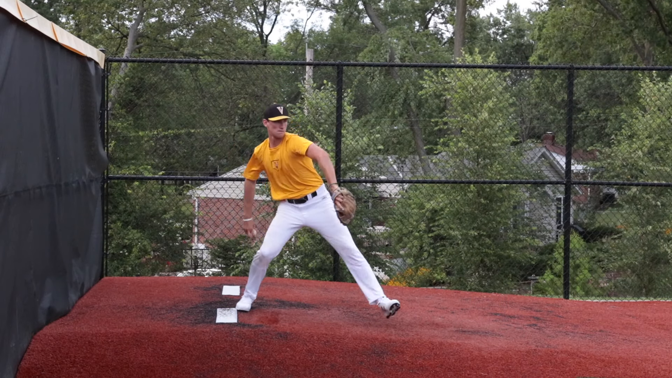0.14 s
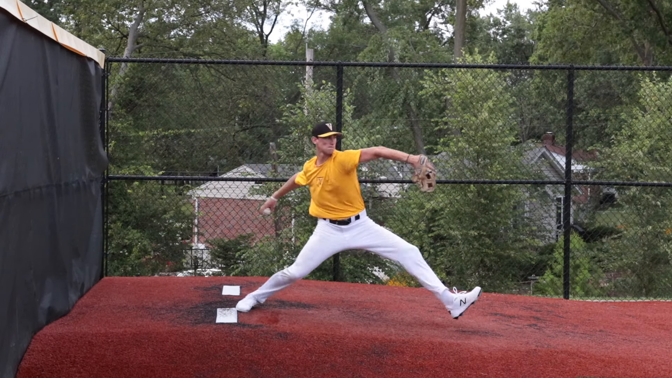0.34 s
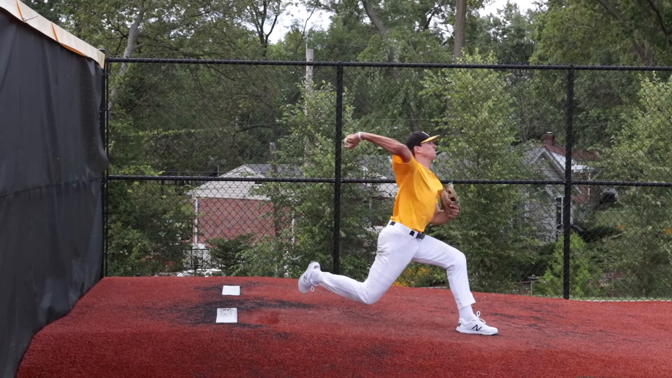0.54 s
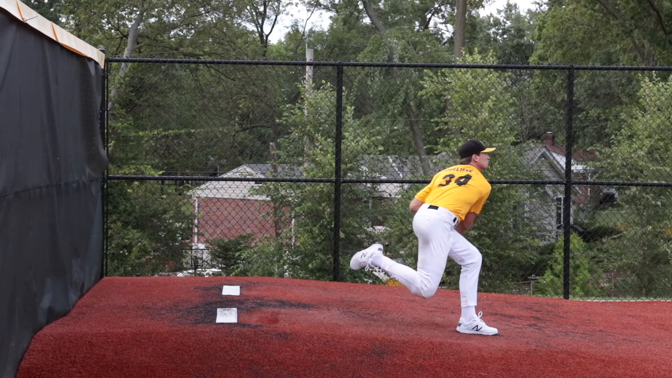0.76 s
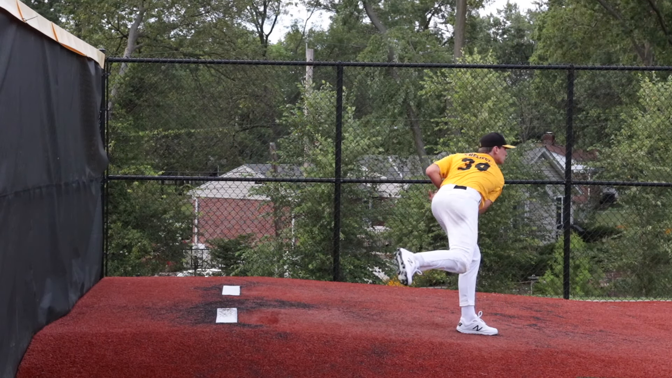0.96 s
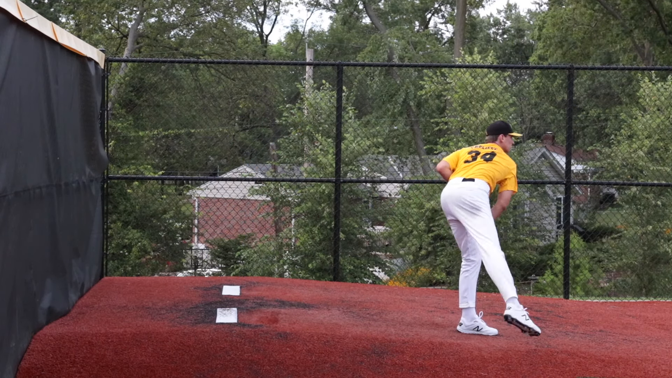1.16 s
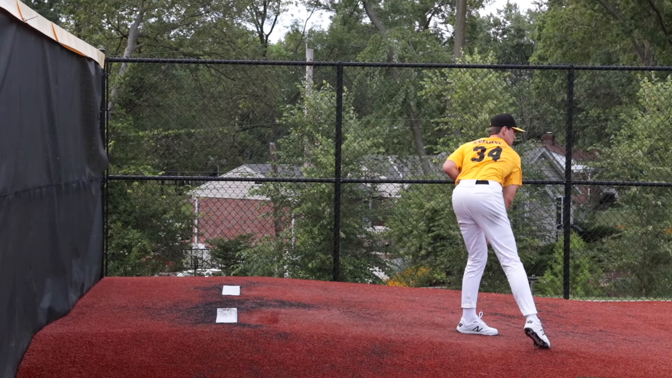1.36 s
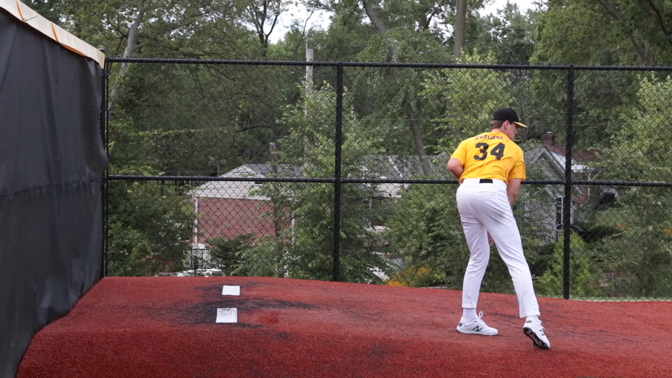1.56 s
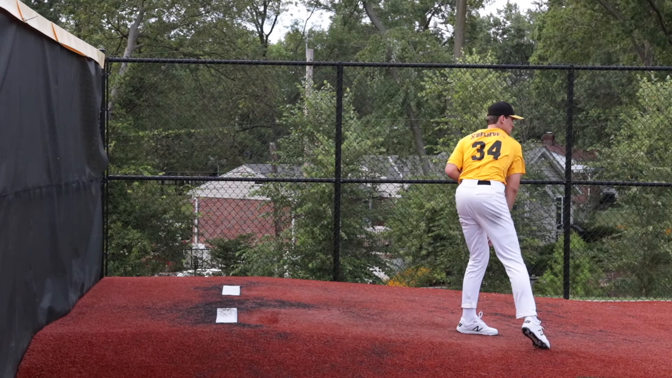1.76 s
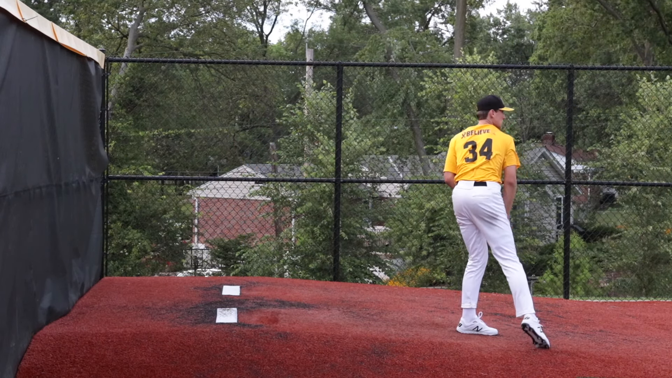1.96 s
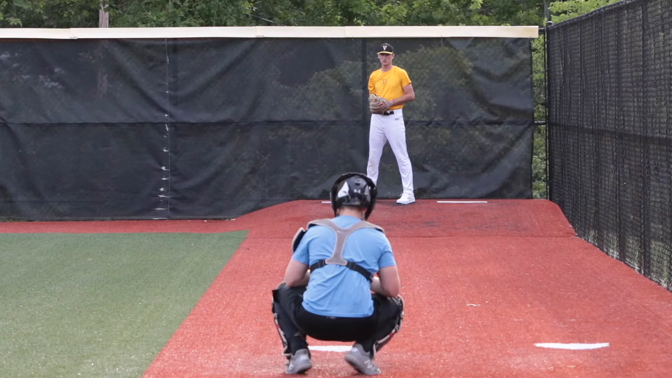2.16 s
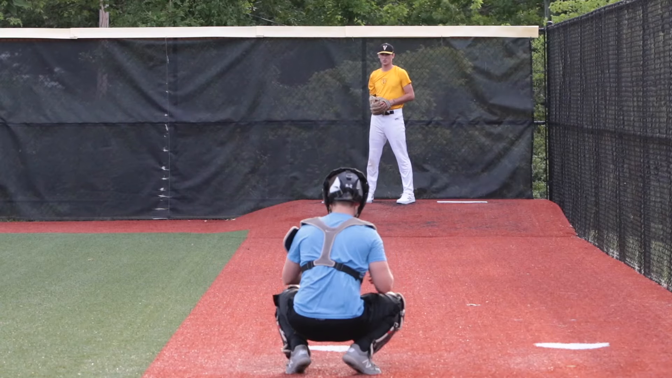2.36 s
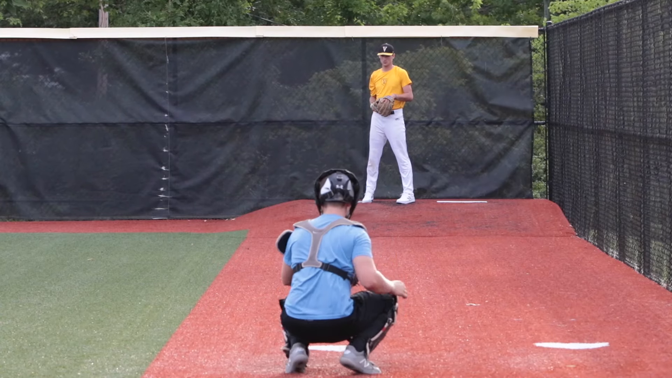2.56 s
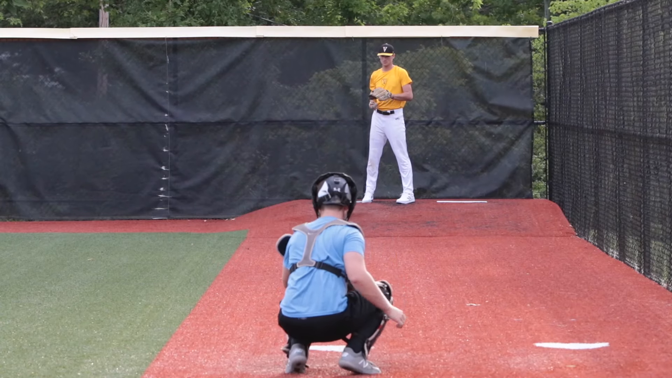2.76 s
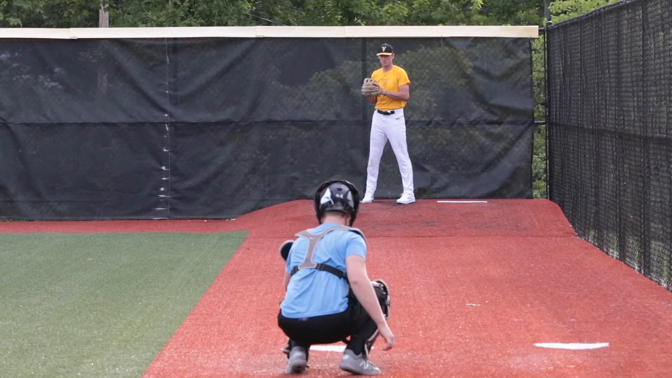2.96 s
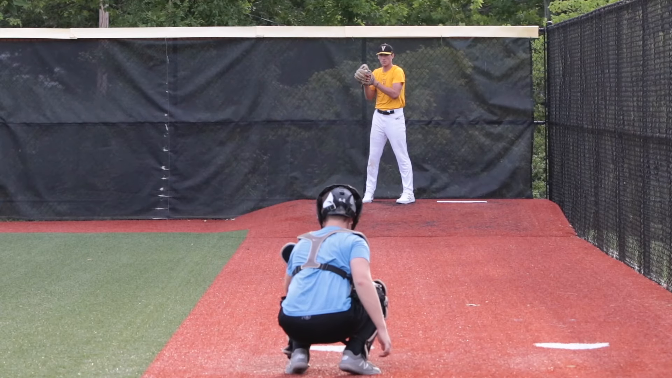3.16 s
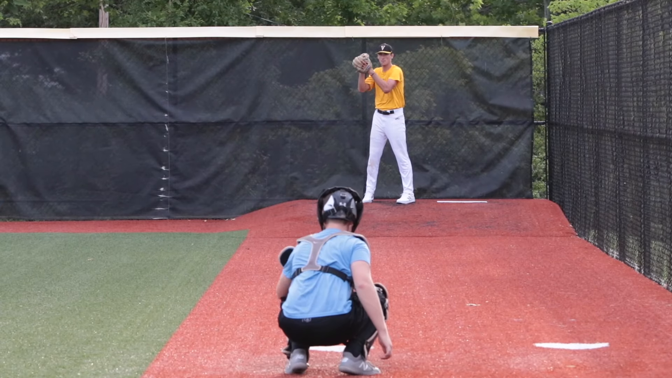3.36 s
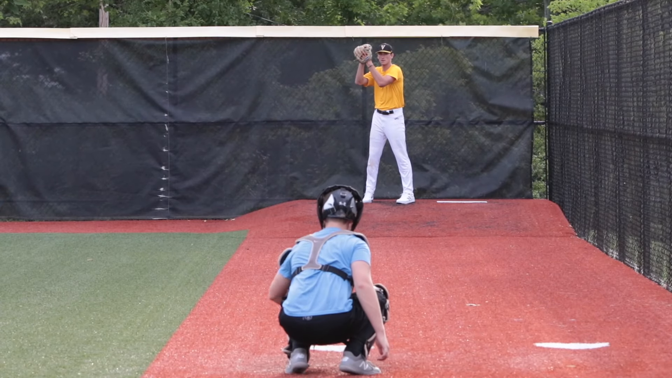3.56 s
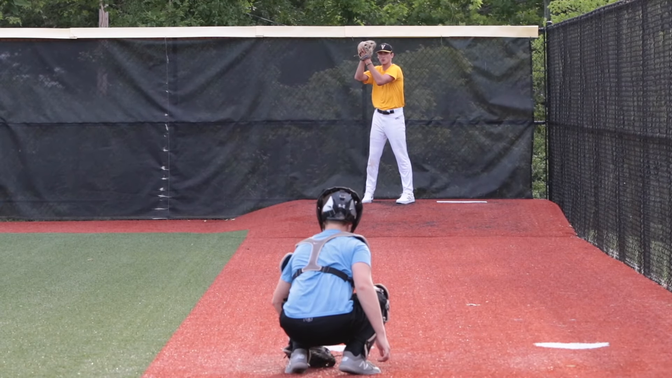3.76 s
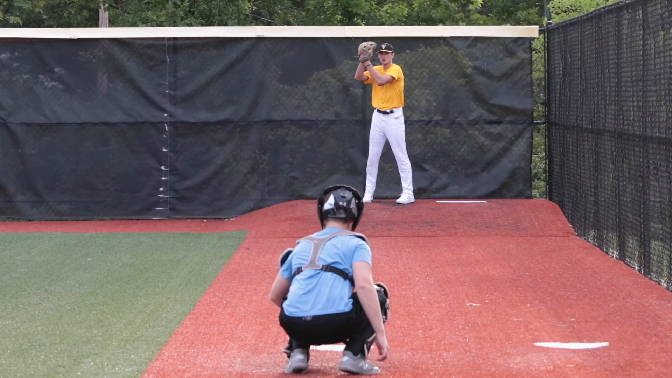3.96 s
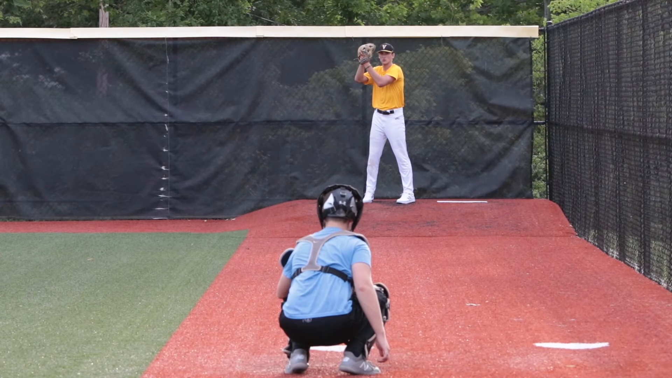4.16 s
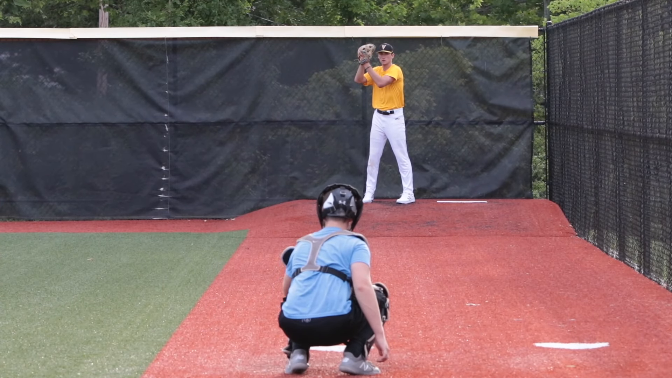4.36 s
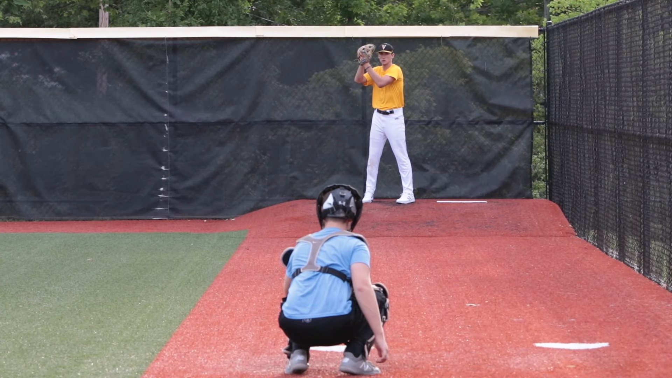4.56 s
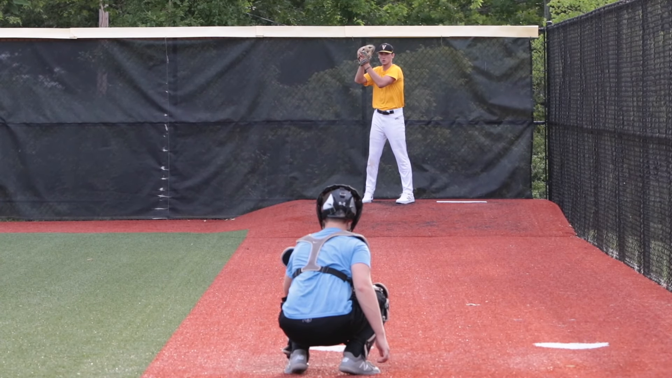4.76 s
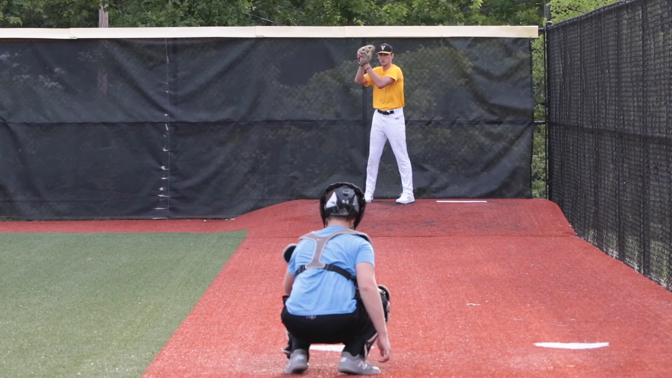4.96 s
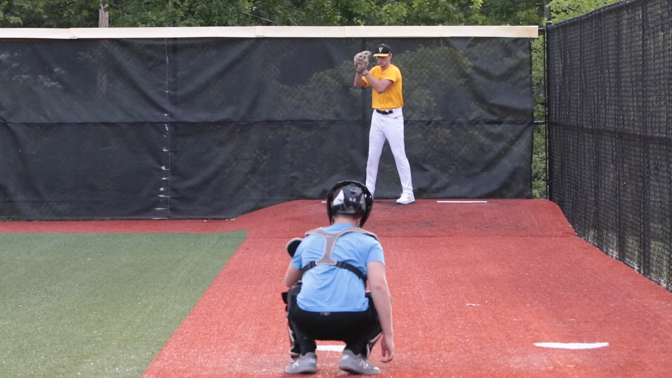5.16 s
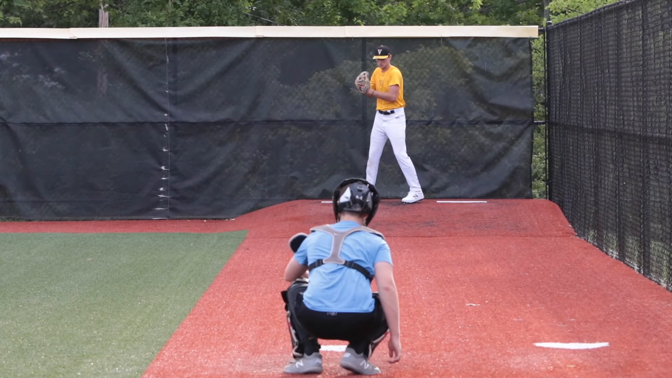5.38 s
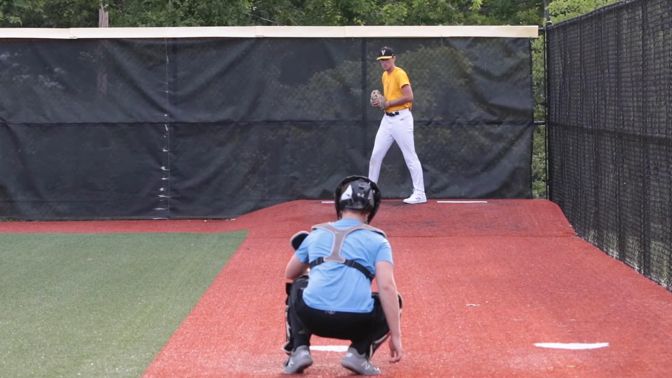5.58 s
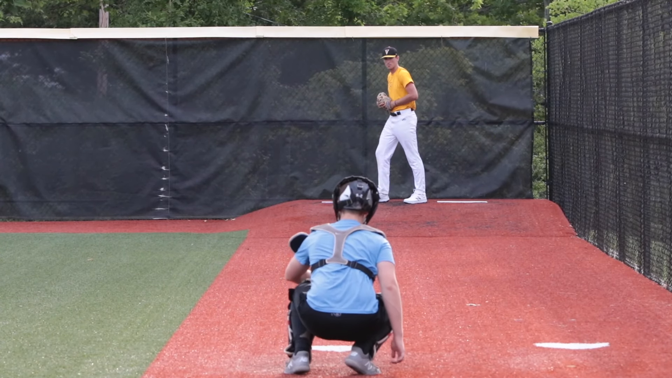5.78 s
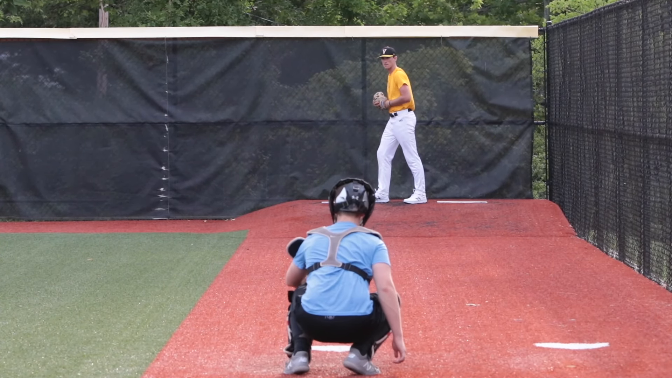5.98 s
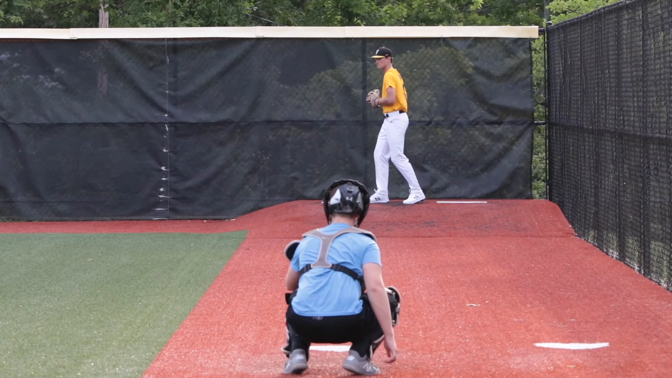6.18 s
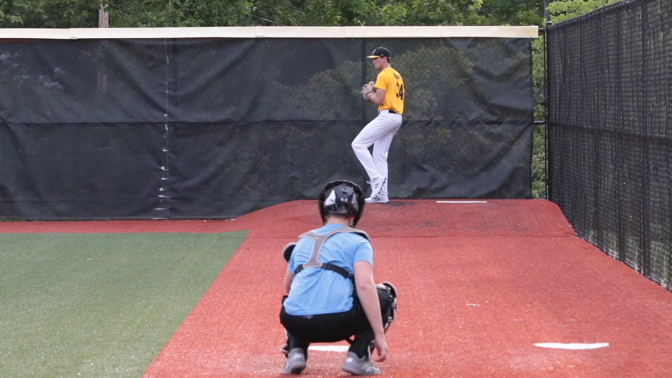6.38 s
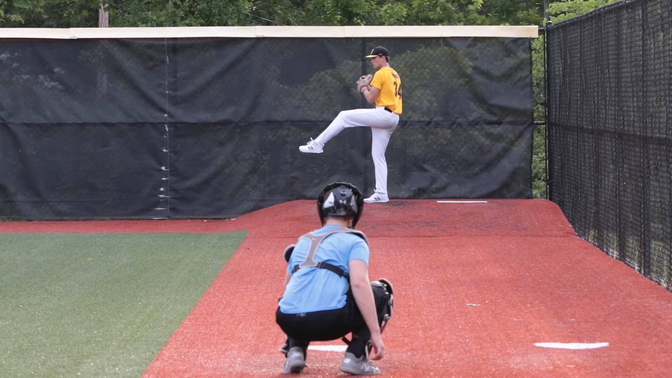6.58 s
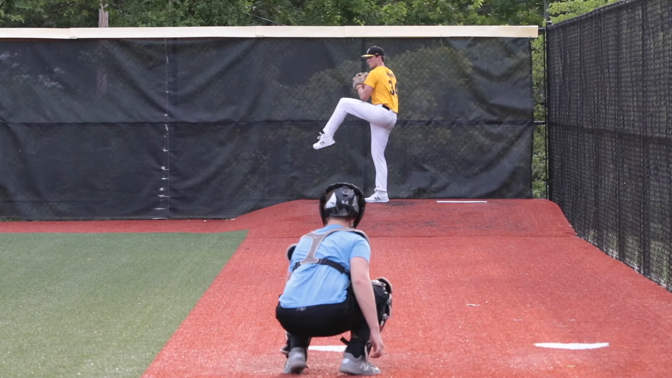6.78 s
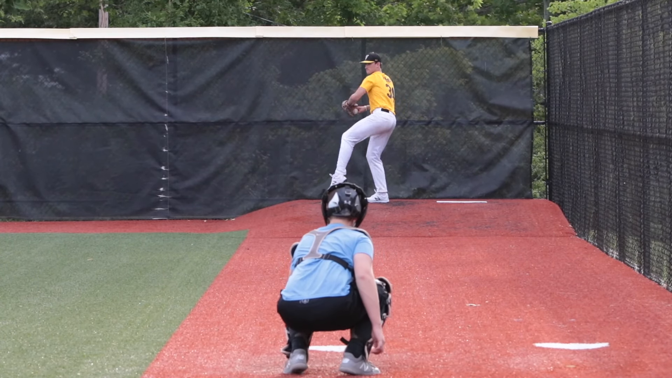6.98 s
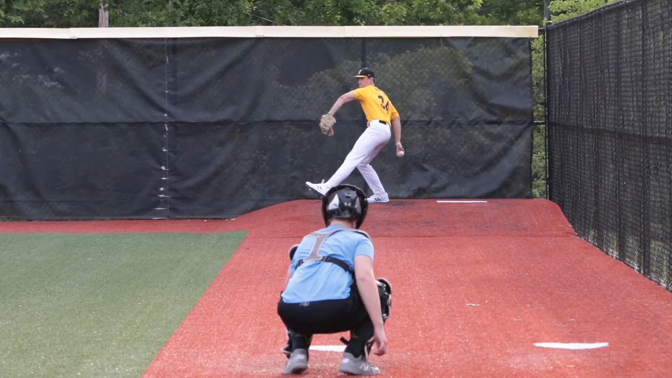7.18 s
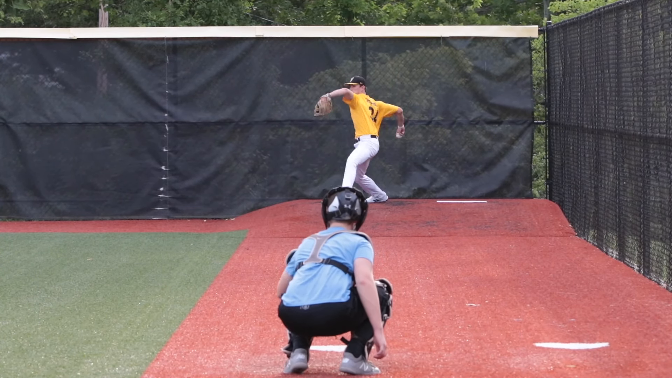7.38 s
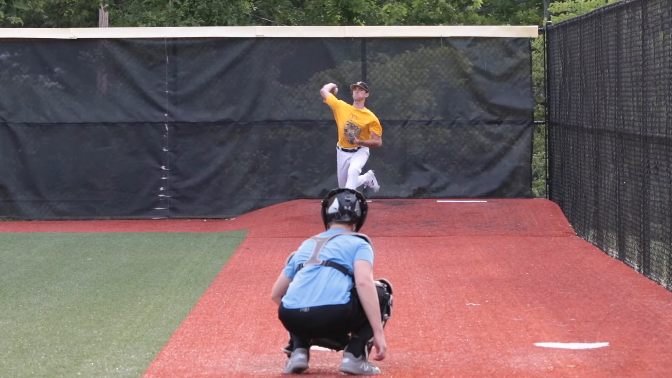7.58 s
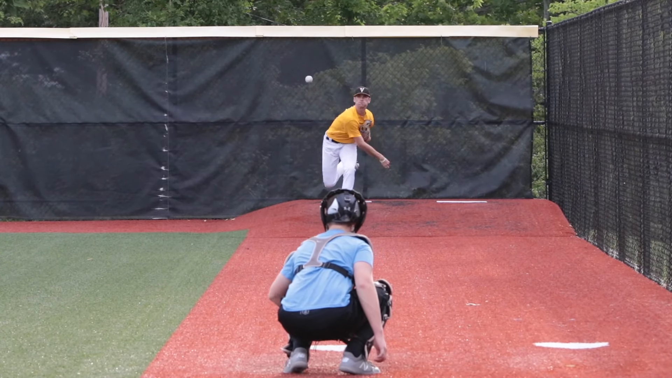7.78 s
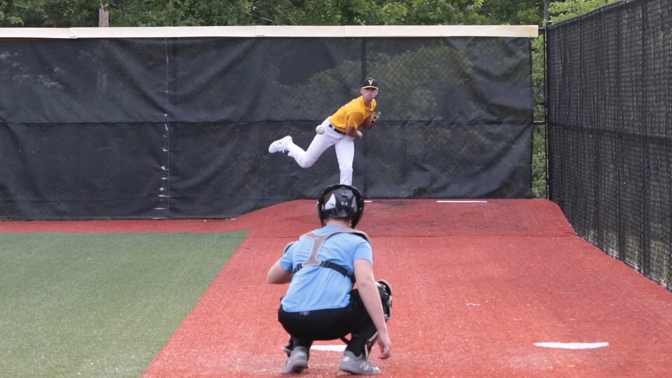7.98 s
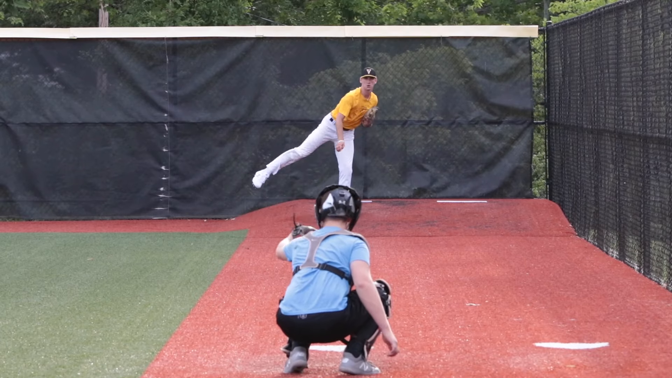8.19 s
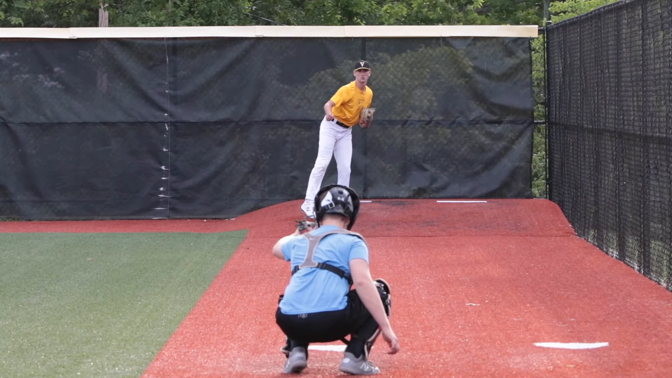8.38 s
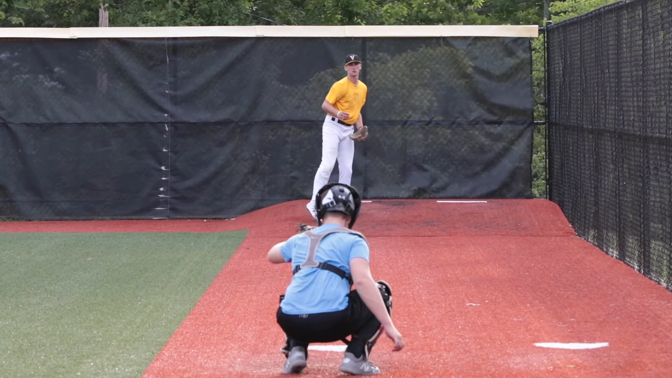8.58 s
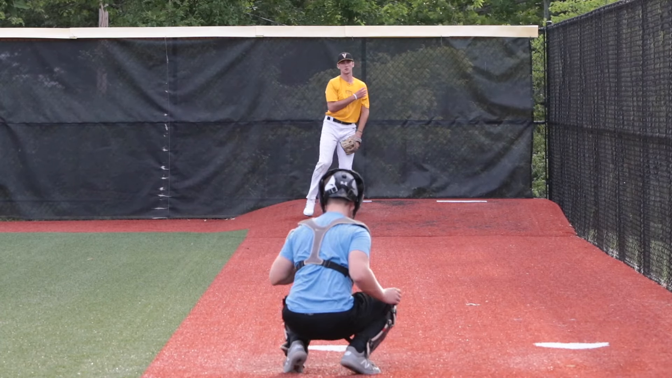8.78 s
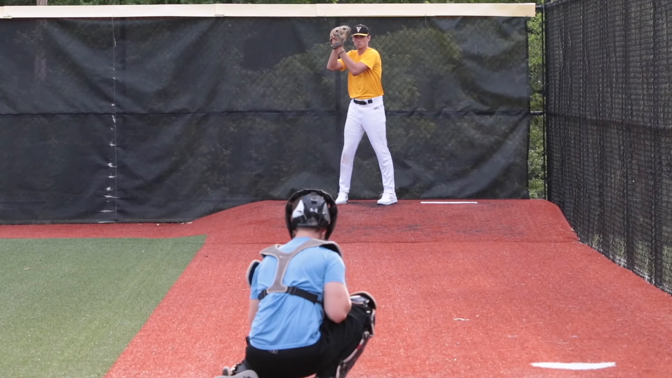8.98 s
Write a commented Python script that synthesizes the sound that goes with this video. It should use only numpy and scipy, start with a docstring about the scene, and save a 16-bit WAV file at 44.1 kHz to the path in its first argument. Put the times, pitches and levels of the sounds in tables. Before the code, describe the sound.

A sharp leather mitt pop, quiet insect buzz and low wind, a small plastic clack with a faint bird whistle, then a duller, closer mitt pop.

```python
"""Two pitches into a catcher's mitt

Each pop is a slap of damped leather modes, a crinkle and a low thump; walls, fence and trees throw it back.
The first is heard from beside the mound, the second from behind the plate, where a distant fan drones.
Gear clacks as ringing shell modes, shoes and cloth scuff as noise bursts, and a far bird whistles two sliding notes.
Insects buzz as resonant noise, air washes, and wind rumbles and flutters on the microphone."""
import sys
import numpy as np
from scipy import signal
from scipy.fft import rfft, irfft
from scipy.io import wavfile
from scipy.ndimage import uniform_filter1d

SR = 44100
rng = np.random.default_rng(int(sys.argv[2]) if len(sys.argv) > 2 else 0)


def store_wav(level_fs):
    """Save 16-bit WAV to argv[1]."""
    pcm = np.round(np.clip(np.atleast_2d(level_fs), -1, 1) * 32767)
    wavfile.write(sys.argv[1], SR, pcm.T.astype(np.int16))


N = 398663
TIME, FREQS = np.arange(N) / SR, np.fft.rfftfreq(N, 1 / SR)


def gain_of(db):
    """Decibels to amplitude."""
    return 10 ** (np.asarray(db) / 20)


def evened(x):
    """Scales to rms 1."""
    return x / np.sqrt(np.mean(x ** 2) + 1e-20)


def add(mix, start_s, sound):
    """Mixes a sound in from start_s, cut at the end of the mix."""
    part = mix[max(round(start_s * SR), 0):][:len(sound)]
    part += sound[:len(part)]


def colour(points):
    """Gain at every frequency from (Hz, dB) points, joined on a log frequency axis."""
    hz, db = np.transpose(points)
    return gain_of(np.interp(np.log(FREQS + 1), np.log(hz + 1), db))


def peaks(modes):
    """Gain at every frequency of a set of (Hz, width Hz, dB) resonances."""
    return sum(gain_of(db) / (1 + ((FREQS - hz) / (0.5 * width_hz)) ** 2) for hz, width_hz, db in modes)


def noise(gain, size=N):
    """Noise of rms 1 with the given spectrum."""
    return evened(irfft(rfft(rng.standard_normal(size)) * gain, size))


def drift(rate_hz):
    """Random wander of rms 1, no faster than about rate_hz."""
    return noise(1 / (1 + (FREQS / rate_hz) ** 4))


def swell(t, rise_s):
    """Envelope of a heavily damped vibration: up to 1 at the rise time, then quickly down."""
    return t / rise_s * np.exp(1 - t / rise_s)


def echo(sound, scatter_s, edge_hz, rise_share=0.1):
    """A rough surface smears the sound in time and dulls it."""
    t = np.arange(int(5 * scatter_s * SR) + 64) / SR
    taps = rng.standard_normal(len(t))
    for _ in range(3):  # scattering spreads the energy evenly over frequency
        spectrum = rfft(taps * np.exp(-t / scatter_s / 2))
        taps = irfft(spectrum / (abs(spectrum) + 1e-12), len(t))
    # the nearest parts answer first, so it swells in
    taps = taps * (1 - np.exp(-t / (rise_share * scatter_s)))
    smeared = signal.fftconvolve(sound, taps * np.exp(-t / scatter_s / 4))
    dull = signal.butter(2, min(edge_hz, 0.45 * SR), fs=SR)
    return signal.lfilter(*dull, smeared)


MOVE_S, MOVE_FADE_S = 2.14, 0.052


def behind_plate():
    """0 while the microphone is by the mound, 1 once it is behind the plate."""
    return np.clip((TIME - MOVE_S) / MOVE_FADE_S, 0, 1)


# Catches. Each row: start in seconds, level in dB, factor on the mitt's mode frequencies,
# tilt in dB per octave, bite in dB, crinkle in dB, thump in Hz, thump in dB, thump rise in seconds,
# delay of the thump's bounce in seconds, bounce in dB.
CATCHES = [(1.2805, -1, 0.93, 1.5, 3, -21, 257, -14, 0.0018, .0095, -16),
           (8.3004, -2.5, 0.67, -5.5, -12, -6.5, 305, -9.5, 0.001, 0.00504, -7)]
# Modes of the slapped leather pocket. Each row: frequency in Hz before the catch's factor,
# level in dB before its level and tilt, rise in seconds.
MITT = [(1380, -2, .00028), (1980, -3, .00036), (2980, -12, .000357), (4500, -16, .0003), (5600, 0, .00026),
        (6800, -11, .0003), (8300, -22, .000263), (10500, -18, .00024), (12600, -20, .00024),
        (15000, -27, .0003)]
# Surfaces answering at each place. Each row: delay in seconds, level in dB, scatter time in seconds,
# treble edge in Hz.
MOUND_ECHOES = [(.0085, -12, 0.0033, 4400), (0.015, -18.5, 0.021, 3200), (.068, -19, 0.039, 4800),
                (.148, -18, 0.012, 1690), (.185, -22.5, .018, 2000), (.11, -16, 0.29, 2800)]
PLATE_ECHOES = [(.0058, -7, 0.00099, 1100), (0.0093, -21, 0.058, 3600), (0.041, -23, 0.0058, 2200),
                (.117, -24.5, 0.0069, 2800), (.07, -13.5, 0.34, 2200)]
SPRAY_DB, SPRAY_LOW_HZ = 22.0, 800
SHUDDER_DB, SHUDDER_RISE_S = -26, 0.0015
BITE_HZ, BITE_Q = 2660, 1.1  # strong from the mound, shaded behind the catcher
CRINKLE_DELAY_S, CRINKLE_S, CRINKLE_EDGE_HZ = 0.0017, 0.0034, 3100
THUMP_ECHO_SHARE = 0.7


def mitt():
    """The ball slaps the pocket, the leather folds round it, the padding thumps, the surroundings answer."""
    out, t = np.zeros(N), np.arange(1200) / SR
    for catch, echoes in zip(CATCHES, (MOUND_ECHOES, PLATE_ECHOES)):
        (start_s, db, size, tilt_db, bite_db, crinkle_db,
         thump_hz, thump_db, thump_rise_s, bounce_s, bounce_db) = catch
        # summed over all directions the crack is one broad pulse
        low_cut = signal.butter(3, SPRAY_LOW_HZ, "high", fs=SR)
        spray = gain_of(db + SPRAY_DB) * signal.lfilter(*low_cut, t == 0)

        # the leather quivers on after the slap
        shudder = gain_of(SHUDDER_DB) * swell(t, SHUDDER_RISE_S)
        slap = np.zeros(len(t))
        for hz, mode_db, rise_s in MITT:  # a catch deep in the padding rings lower and duller
            height = gain_of(db + mode_db + tilt_db * np.log2(hz / MITT[0][0]))
            ring = np.sin(2 * np.pi * hz * size * (t - rise_s))
            slap += height * (swell(t, rise_s) + shudder) * ring
        crinkle = echo(spray, CRINKLE_S, CRINKLE_EDGE_HZ)
        add(slap, CRINKLE_DELAY_S, gain_of(crinkle_db) * crinkle)
        bite = signal.lfilter(*signal.iirpeak(BITE_HZ, BITE_Q, SR), slap)
        add(out, start_s, slap + (gain_of(bite_db) - 1) * bite)

        thump = -gain_of(thump_db) * swell(t, thump_rise_s) * np.sin(2 * np.pi * thump_hz * t)
        add(out, start_s, thump)
        # long waves bounce cleanly off the ground
        add(out, start_s + bounce_s, gain_of(bounce_db) * thump)

        struck = spray + THUMP_ECHO_SHARE * thump
        for delay_s, echo_db, scatter_s, edge_hz in echoes:
            add(out, start_s + delay_s, gain_of(echo_db) * echo(struck, scatter_s, edge_hz))
    return out


# Clacks of the gear. Each row: start in seconds, level in dB, factor on the shell's mode frequencies,
# factor on their ring time and on the grit's amplitude.
CLACKS = [(6.0453, -17.5, .97, 0.43), (6.047, -18.5, 1.0, 0.88), (6.05, -35, 1.0, 1.5),
          (6.082, -29, 1.0, 0.82), (6.128, -31, 1.02, 0.67), (6.148, -31, 1.06, 0.56)]
# Modes of the hard shell. Each row: frequency in Hz and level in dB, t60 in seconds, all before the clack's factors.
SHELL = [(1186, -20, 0.11), (2560, -14, 0.021), (2750, -8, 0.034), (3050, -8, 0.024), (3450, -9.5, 0.018),
         (4400, -9, 0.018), (5340, 0, 0.024), (5860, -3.5, 0.049), (6230, -6.5, .018)]
TICK_DB, TICK_T60_S, CONTACT_S = -11, 0.066, 0.00014


def gear():
    """A hard shell clacks and rebounds: short modes with a gritty tick."""
    out, t = np.zeros(N), np.arange(5000) / SR
    grit_band = signal.butter(1, [2400, 6000], "band", fs=SR)
    for start_s, db, size, ringing in CLACKS:
        ring = np.zeros(len(t))
        for hz, mode_db, t60_s in SHELL:
            fade = gain_of(mode_db - 60 * t / (t60_s * ringing))
            ring += fade * np.sin(2 * np.pi * (hz * size * t + rng.random()))
        grit = evened(signal.lfilter(*grit_band, rng.standard_normal(len(t))))
        tick = ringing * grit * gain_of(TICK_DB - 60 * t / TICK_T60_S)
        contact = 1 - np.exp(-t / CONTACT_S)
        add(out, start_s, gain_of(db) * contact * (ring + tick))
    return out


# Steps, scuffs, swishes of clothing and a soft low bump. Each row: peak in seconds,
# half length in seconds, level in dB, centre in Hz, width in octaves.
SCUFFS = [(0.572, 0.037, -46, 735, 0.96), (.67, 0.011, -39, 130, 0.29), (0.712, 0.0066, -36, 386, 0.43),
          (0.72, 0.026, -51, 1700, 1.2), (2.516, 0.091, -56, 8200, .55), (2.962, 0.033, -33, 79.5, 0.56),
          (3.419, 0.18, -60, 2100, .6), (5.364, .06, -59, 9500, 0.55), (5.33, 0.031, -53.5, 1700, 0.36)]


def scuffs():
    """Shoes on turf, moving cloth and a bump: brief swells of band noise."""
    out = np.zeros(N)
    for peak_s, half_s, db, hz, octaves in SCUFFS:
        t = np.arange(-3 * half_s, 3 * half_s, 1 / SR)
        octaves_off = np.log2((np.fft.rfftfreq(len(t), 1 / SR) + 1) / hz)
        band = np.exp(-0.5 * (octaves_off / octaves) ** 2)
        burst = noise(band, size=len(t)) * np.exp(-(t / half_s) ** 2)
        add(out, peak_s - 3 * half_s, gain_of(db) * burst)
    return out


# Pitch of the whistle, up and then a long slide down. Each row: time in seconds, pitch in Hz.
BIRD = [(5.99, 3450), (6.069, 4530), (6.17, 4530), (6.25, 4040), (6.3, 3880), (6.325, 3550), (6.62, 3180),
        (6.95, 2920)]
# Its two notes. Each row: start in seconds, end in seconds, starting level in dB.
NOTES = [(6.0, 6.27, -48), (6.303, 6.92, -53)]
BIRD_ATTACK_S, BIRD_FADE_DB_PER_S, BIRD_RELEASE_S = 0.015, -29, 0.055
WAVER_SHARE, WAVER_HZ = 0.0029, 56
FLICKER_DB, FLICKER_HZ = 1.0, 25
BIRD_WET_DB = -6


def bird():
    """A thin far whistle: each sine note starts quickly and fades as it slides, blurred by the trees."""
    pitch_hz = np.interp(TIME, *np.transpose(BIRD)) * (1 + WAVER_SHARE * drift(WAVER_HZ))
    level = np.zeros(N)
    for start_s, end_s, db in NOTES:
        t = np.arange(0, end_s - start_s, 1 / SR)
        gate = np.clip(np.minimum(t / BIRD_ATTACK_S, t[::-1] / BIRD_RELEASE_S), 0, 1)
        add(level, start_s, gate * gain_of(db + BIRD_FADE_DB_PER_S * t))
    whistle = np.sin(2 * np.pi * np.cumsum(pitch_hz) / SR)
    call = level * gain_of(FLICKER_DB * drift(FLICKER_HZ)) * whistle
    return call + gain_of(BIRD_WET_DB) * echo(call, 0.05, 8000)[:N]


# Bouts of the nearest insect. Each row: start in seconds, end in seconds, starting level in dB, gain in dB per second.
BOUTS = [(1.69, 6.78, -47.5, -1.23), (8.402, 9.6, -56, 9)]
# Its resonances. Each row: frequency in Hz, width in Hz, relative level in dB.
BUZZ = [(4700, 120, -12), (5060, 300, -5), (5330, 150, -7), (5570, 65, 3), (5975, 70, -4), (6190, 85, -3)]
# Spectrum of the chorus. Each row: frequency in Hz, relative level in dB per Hz.
CHORUS = [(2000, -53), (3000, -21.5), (3800, -11), (4500, -5), (5000, -1.5), (5350, -1.5), (5900, -4.5),
          (6400, -16), (7500, -22), (10000, -67)]
# Level of the chorus. Each row: time in seconds, level in dB.
CHORUS_DB = [(0, -51), (2.1, -49), (2.2, -52), (4, -51), (6, -51), (7.3, -51.5), (8.2, -49.5), (9, -48)]
PHRASE_EVERY_S, PHRASE_S, PHRASE_RISE_S, PHRASE_FALL_S = 0.675, 0.59, 0.14, 0.027
RASP_DB, RASP_HZ = -1.4, 150
SHIMMER_DB, SHIMMER_HZ = 1.27, 27


def insects():
    """One insect, heard behind the plate, rasps in even phrases through its resonances, over a blended chorus."""
    effort = np.zeros(N)
    for start_s, end_s, db, db_per_s in BOUTS:
        t = np.arange(0, end_s - start_s, 1 / SR)
        into_s = t % PHRASE_EVERY_S
        left_s = np.minimum(PHRASE_S - into_s, t[-1] - t)
        phrase = np.clip(np.minimum(into_s / PHRASE_RISE_S, left_s / PHRASE_FALL_S), 0, 1)
        add(effort, start_s, gain_of(db + db_per_s * t) * np.sqrt(phrase))
    near = behind_plate() * effort * noise(peaks(BUZZ)) * gain_of(RASP_DB * drift(RASP_HZ))
    chorus_db = np.interp(TIME, *np.transpose(CHORUS_DB)) + SHIMMER_DB * drift(SHIMMER_HZ)
    return near + noise(colour(CHORUS)) * gain_of(chorus_db)


# Strength of the wind on the microphone. Each row: time in seconds, rumble in dB, flutter in dB.
WIND = [(0, -31.5, -34), (.15, -29.5, -34), (.7, -35.5, -40.5), (1.0, -30, -36.5), (1.25, -33.5, -38.5),
        (1.45, -27, -31), (2.1, -32.5, -36), (2.4, -39.5, -47), (3.1, -43, -43), (3.5, -36.5, -38),
        (4.05, -40, -41.5), (4.25, -41.5, -50), (4.8, -45.5, -49.5), (5.75, -33.5, -45.5), (5.95, -41, -47),
        (6.9, -35.5, -47), (7.3, -43, -53.5), (7.65, -31, -40.5), (8.0, -33.5, -41), (8.27, -24, -28),
        (8.6, -33, -38), (9.04, -36, -50.5)]
# Spectra of the big and the small eddies. Each row: frequency in Hz, relative level in dB per Hz.
RUMBLE = [(6, -9.5), (16, -1.5), (32, 4.5), (46, -1), (58, -10), (80, -37), (140, -49), (600, -120)]
FLUTTER = [(35, -21), (58, 3.5), (80, -2.5), (102, -5.5), (135, -14.5), (200, -22), (280, -29.5),
           (500, -46), (3000, -100)]
BUFFET_DB, BUFFET_HZ = 1.73, 7


def wind():
    """Gusts on the microphone: big eddies rumble, small ones flutter, quick random buffets ride on both."""
    gust_s, *levels_db = np.transpose(WIND)
    out = np.zeros(N)
    for db, spectrum in zip(levels_db, (RUMBLE, FLUTTER)):
        eddies = noise(colour(spectrum))
        # level out the slow swells, so that the gusts alone set the strength
        eddies = eddies / np.sqrt(uniform_filter1d(eddies ** 2, size=7000) + 1e-6)
        out += eddies * gain_of(np.interp(TIME, gust_s, db))
    return out * gain_of(BUFFET_DB * drift(BUFFET_HZ))


# Wash of air and far insects at each place. Each row: frequency in Hz, relative level in dB per Hz.
MOUND_AIR = [(150, -4), (290, 0), (420, 2), (560, 0.5), (900, 3), (1400, -3), (2000, -8), (2700, -11),
             (3600, -3), (4700, -5), (5300, -1.5), (5900, -6.5), (7000, -7), (8300, -18), (10000, -21.5),
             (15700, -22)]
PLATE_AIR = [(120, -2), (220, 0.5), (400, -7.5), (560, -4.5), (900, -2.5), (1300, -8.5), (2000, -15),
             (2700, -18), (3500, -11), (6600, -14), (8000, -20.5), (9500, -26.5), (15700, -27)]
# Resonances of the fan. Each row: frequency in Hz, width in Hz, relative level in dB.
FAN = [(303, 16.4, 0), (331, 25, -4.5), (148.5, 41, -5), (211, 79, -8.5), (497, 32, -11.5)]
MOUND_DB, PLATE_DB, FAN_DB = -47, -48, -47.5
AIR_SWELL_DB, AIR_SWELL_HZ = 0.64, 13.0


def air():
    """Outdoor wash of shaped noise at each place; a distant fan drones in narrow bands behind the plate."""
    moved = behind_plate()
    mound = gain_of(MOUND_DB) * noise(colour(MOUND_AIR))
    fan = gain_of(FAN_DB) * noise(peaks(FAN))
    plate = gain_of(PLATE_DB) * noise(colour(PLATE_AIR)) + fan
    wash = np.sqrt(1 - moved) * mound + np.sqrt(moved) * plate
    return wash * gain_of(AIR_SWELL_DB * drift(AIR_SWELL_HZ))


HISS_DB = -64


def hiss():
    """Faint high hiss, independent noise in each channel."""
    spectrum = colour([(3000, -17.0), (7000, -53), (8500, 4.5), (12000, 4.0), (16000, -2)])  # (Hz, dB per Hz)
    return gain_of(HISS_DB) * np.array([noise(spectrum) for _ in range(2)])


def scene():
    """Every source reaches both channels alike, over the hiss of each."""
    return mitt() + gear() + scuffs() + bird() + insects() + wind() + air() + hiss()


EDGE_HZ = 15900


def record(dry):
    """The input overloads at full scale; then a low-pass limits the band."""
    clipped = np.clip(dry, -1, 1)
    low_pass = signal.firwin(255, EDGE_HZ, window=("kaiser", 8), fs=SR)
    return signal.oaconvolve(clipped, low_pass[None], "same")


dry = scene()
out = record(dry)
store_wav(out)
```